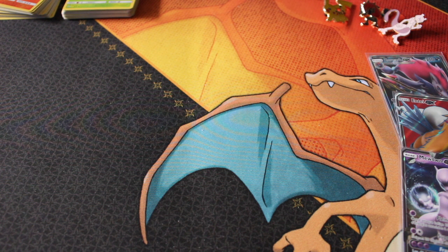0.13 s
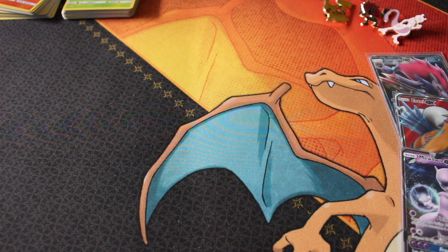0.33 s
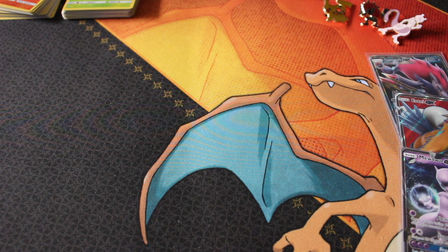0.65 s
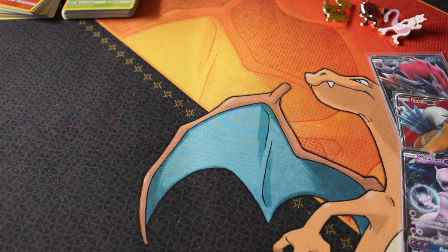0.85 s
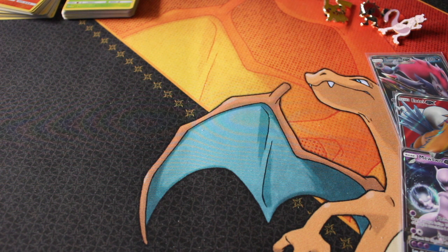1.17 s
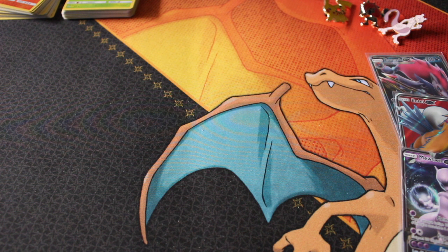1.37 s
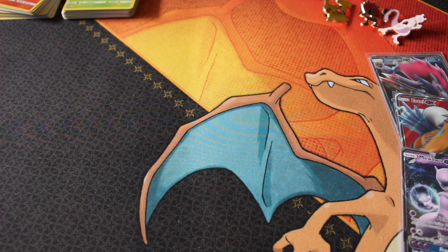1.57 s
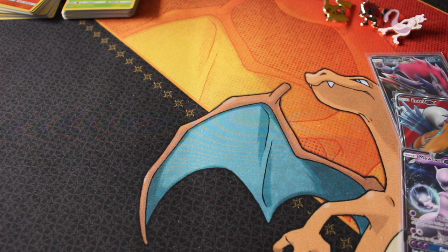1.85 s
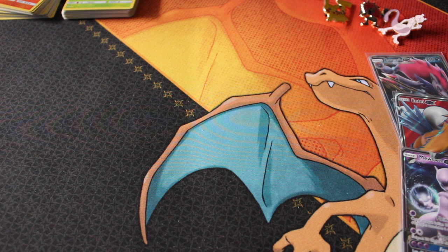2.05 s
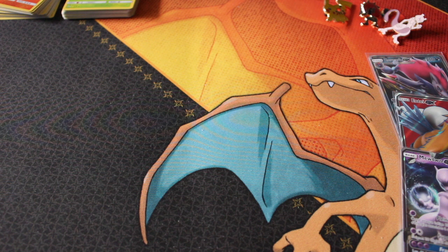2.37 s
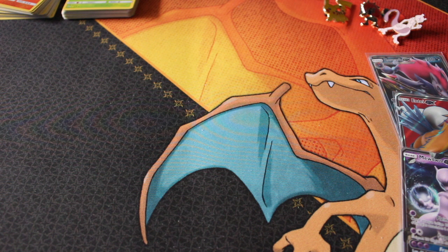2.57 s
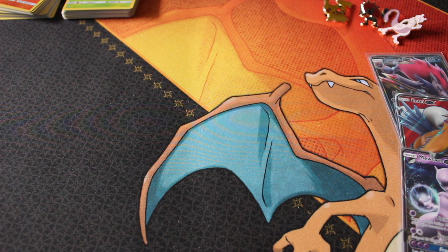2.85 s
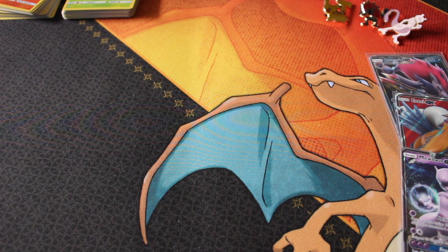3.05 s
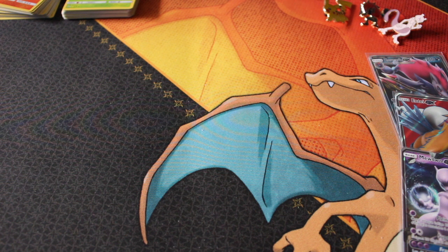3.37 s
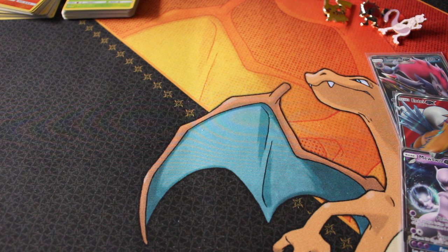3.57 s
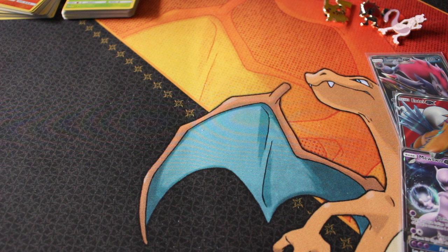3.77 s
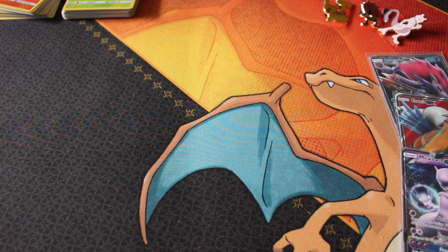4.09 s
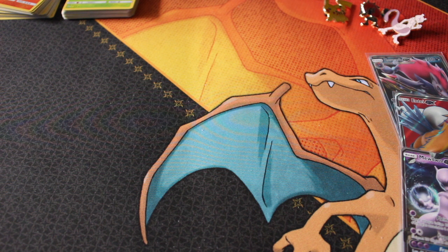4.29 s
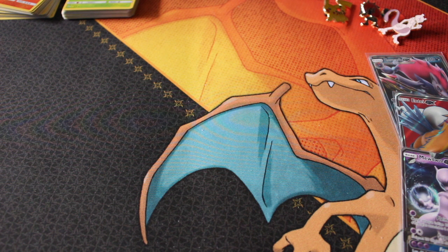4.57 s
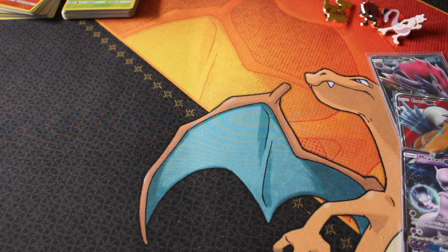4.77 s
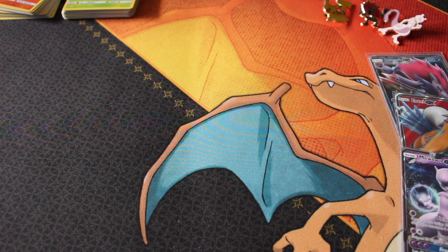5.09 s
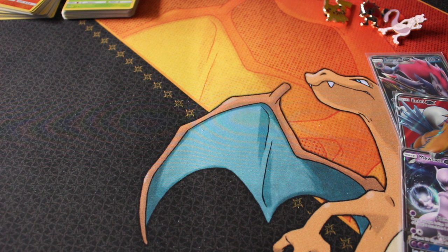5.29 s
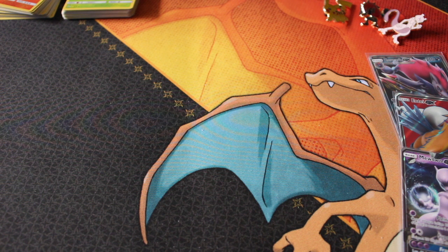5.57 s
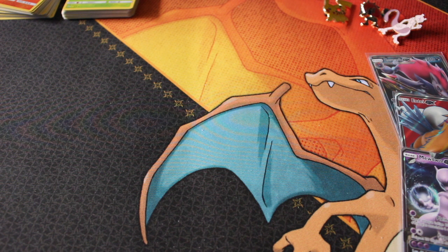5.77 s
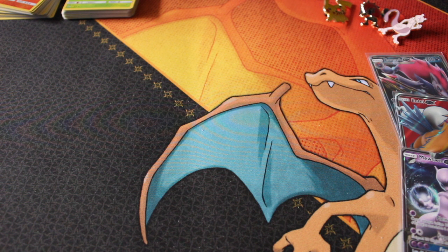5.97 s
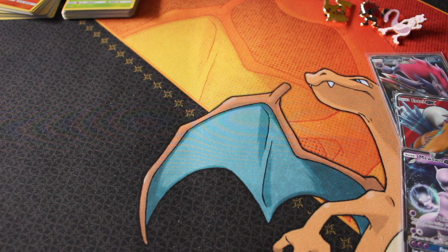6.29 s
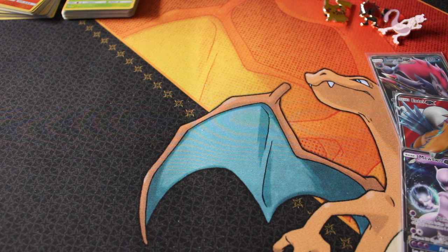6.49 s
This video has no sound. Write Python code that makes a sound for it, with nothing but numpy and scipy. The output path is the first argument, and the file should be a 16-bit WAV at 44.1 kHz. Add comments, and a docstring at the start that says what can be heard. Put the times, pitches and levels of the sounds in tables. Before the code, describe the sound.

Close, slightly roomy handling of a hollow box on a table. Irregular taps and papery, plasticky tears come first, then the loudest boxy knocks, a brief lull, and bright rips. Light scraping and small clicks continue, one more hard knock stands out past the middle, and quieter bumps lead to renewed ripping at the end. Faint hiss, low fan hum and a very thin high whine stay steady.

```python
"""A cardboard and plastic pack is handled near a table microphone in a small room, for 6.6 s.
Knocks and short rips start at once; the hardest knocks land near 1.3-1.5 s, rips cluster near 2.3 s,
another hard knock hits near 3.9 s, then softer ones, with a last flurry of rips and knocks from 5.9 s.
Knocks and rips are bursts of crackling noise through box resonances and room tails. Throughout, pieces
slide (scrape-coloured crackle) over hiss, a fan hum (two narrow noise bands) and a faint screen whine (a sine).
"""
import sys
import numpy as np
from scipy import signal
from scipy.fft import rfft, irfft, next_fast_len
from scipy.io import wavfile
from scipy.ndimage import uniform_filter1d

SR = 44100
rng = np.random.default_rng(int(sys.argv[2]) if len(sys.argv) > 2 else 0)


def to_wav(s):
    """Save 16-bit WAV."""
    ch = np.atleast_2d(s).T  # columns
    pcm = np.round(np.clip(ch, -1, 1) * 32767)  # PCM
    wavfile.write(sys.argv[1], SR, pcm.astype(np.int16))


N = 292824  # length [samples]
SPAN = 2 ** 15  # transform length of one burst [samples]
SNAP_OCT_PER_DB = 0.017  # crisper contact, higher snap [octaves per dB of click]
PANEL_SHARE = 0.5  # the panel follows the snap part of the way [dB per dB]

# Knocks on the box; snap, click and thump levels are relative to the hollow ring:
# (time [s], hollow ring level [dB], snap [dB], click [dB], contact decay time [s], thump [dB])
KNOCKS = [(0.004, -25, -12, -13, .002, -5), (0.386, -20.5, -12, -30, .003, -14),
          (0.476, -16, 6, 0, .004, -7), (0.526, -21, 6, 1, .004, -30), (0.65, -24.5, -8, -23, .006, -9),
          (0.689, -22, 0, -38, .003, -27), (0.899, -29, -23, -28, .003, 0),
          (0.986, -19.5, 2, -30, .0034, -20), (1.146, -15.5, -9, -18, .009, 0.5),
          (1.166, -16, -7, -19, .013, -20), (1.344, -8, -2, -12, .005, -7),
          (1.418, -22, -8, -19.5, .009, -14.5), (1.54, -4, -2, -13, .003, -8),
          (2.047, -52, 10.5, 9.5, .007, 2), (2.199, -25.5, 0, -36, .008, -9),
          (3.127, -33.5, -9, -10, .015, -11.5), (3.168, -29, -7, -9, .01, -21),
          (3.655, -39, -3, -10, .005, -5), (3.94, -9, 4, -1, .002, -30), (4.152, -21, -7, -14, .0044, -20),
          (4.373, -36.5, -10, -14, .0036, -23), (4.874, -29, -18, -28, .003, -13),
          (4.955, -26, -11, -40, .004, -31), (5.198, -42, -14, -1, .005, -8),
          (5.33, -35, -20, -19, .004, -12), (5.505, -35, -13, -20, .007, -13),
          (5.543, -27.5, -20, -36, .005, -29), (5.665, -40.5, -2, -7, .0045, -0.5),
          (5.747, -53, -1, 8, .0035, -6), (6.276, -23, -12, -5.5, .008, -2),
          (6.33, -31.5, 0, -8.5, .007, -18), (6.401, -33, 5.5, -5.5, .006, -6),
          (6.506, -38, -1, -5, .006, -3), (6.547, -40, 7, 0, .0026, -15)]


def knocks():
    """Fingers and table edge strike the box: sudden contact with a strong first blow."""
    return bursts(KNOCKS, pitch_hz=2250, lift_db=3, rise=0.23, spiky_db=4.0, blow=0.32,
                  breadth=1.26, sheen_hz=7000, wet_db=-2.77)


RIP_THUMP_DB = -10  # over the hollow ring: one thump level shared by all rips
# Tears of seams and film; snap and click levels are relative to the hollow ring:
# (time [s], hollow ring level [dB], snap [dB], click [dB], tear decay time [s])
RIPS = [(0.07, -49, 7, -18, .04), (0.199, -49, 6, -1, .014), (0.223, -32, 2, -4, .013),
        (0.24, -28, 0, 3, .028), (0.253, -32, 4, 6, .023), (0.273, -22, 2, -13, .007),
        (0.364, -37, 2, -15, .007), (0.438, -37, 6, 7, .007), (0.468, -28, 3, 4, .02),
        (0.489, -34, 0, 10, .005), (0.785, -48, -0.5, -8, .022), (2.138, -50, -6, -30, .015),
        (2.256, -48, 12, 9, .025), (2.298, -23, 7, 1, .01), (2.316, -26, 10, 4, .012),
        (2.344, -29, 7, 10, .011), (2.626, -51, 4, 7, .02), (2.674, -46, 5, 10, .005),
        (2.691, -36, 10, 10, .011), (3.251, -48, 7, 5, .034), (3.28, -48, -5, 5, .012),
        (3.41, -54, -12, 6, .015), (3.675, -45, 1, 4, .018), (3.689, -35, -1, -3.5, .016),
        (3.759, -52, 5.5, -3, .018), (3.863, -43, -5, -9, .045), (3.896, -40, 5, 2, .045),
        (4.039, -38, 5.5, 1, .022), (4.284, -49, -7, -6, .014), (4.452, -41, -6, -8.5, .018),
        (4.479, -43, -6, -5, .016), (5.219, -45, -20, -14, .03), (5.682, -40, -6, -12, .009),
        (5.913, -56, 5, -5, .02), (5.94, -41.5, -1, -1, .045), (6.01, -28, 6, 3.5, .023),
        (6.023, -29, 14, -1, .0054), (6.31, -30, -8, -3, .006)]


def rips():
    """Seams and film give way: a swelling run of snaps with little first blow."""
    tears = [(*row, RIP_THUMP_DB) for row in RIPS]
    return bursts(tears, pitch_hz=2500, lift_db=2.5, rise=0.3, spiky_db=5.5, blow=0.15,
                  breadth=1.26, sheen_hz=12000, wet_db=-4.5)


def bursts(table, pitch_hz, lift_db, rise, spiky_db, blow, breadth, sheen_hz, wet_db):
    """Short forces on the box: hollow ring, thump, panel, snap and click, each answered by the room."""
    start_s, ring_db, snap_db, click_db, length, thump_db = np.transpose(table)[:, :, None]
    panel_db = lift_db + PANEL_SHARE * snap_db
    snap_hz = pitch_hz * 2 ** (SNAP_OCT_PER_DB * click_db)  # pitch_hz: click as loud as the ring

    t = np.arange(SR // 5) / SR
    hz = np.fft.rfftfreq(SPAN, 1 / SR)
    length = np.clip(length, 1e-3, 0.1)
    shape = (1 - np.exp(-t / (rise * length))) * np.exp(-t / length)
    shape = shape / shape.max(axis=1, keepdims=True)
    energy = np.sqrt(np.sum(shape ** 2, axis=1, keepdims=True))  # root of the envelope's energy
    chatter = shape * crackle(shape.shape, spiky_db, grain=40)
    first_contact = blow * energy * (t == 0)
    force = rfft(chatter + first_contact, SPAN)

    # even strength from range to range, uneven within each
    broad = uniform_filter1d(np.abs(force) ** 2, size=280, axis=1)
    direct = force / np.sqrt(broad) * box(hz)
    first_wall_delay = np.exp(-2j * np.pi * hz * 0.004)  # 4 ms
    walls = first_wall_delay * rfft(tails(count=len(table)), SPAN)

    def part(colour, order):
        """Each part of a burst gets its own random room tail, so the parts blend without cancelling."""
        dry_part = direct * colour
        wet_part = dry_part * np.roll(walls, order, axis=0)
        return unit(dry_part) + amp(wet_db) * unit(wet_part)

    hollow = part(peak(hz, 440, 636) ** 3, order=0)
    thump = amp(thump_db) * part(peak(hz, 140, 220) ** 3, order=1)
    panel = amp(panel_db) * part(peak(hz, 1056, 920) ** 2, order=2)
    snap = amp(snap_db) * part(peak(hz, snap_hz, breadth * snap_hz) ** 3, order=3)
    click = amp(click_db) * part(peak(hz, 4630, sheen_hz) ** 2 * peak(hz, 2580, 4000), order=4)
    mix = irfft(hollow + thump + panel + snap + click, SPAN)[:, :SR * 2 // 3]
    heard = amp(ring_db) * energy * mix

    out = np.zeros(N + SPAN)
    for start, row in zip(start_s[:, 0], heard):
        out[round(start * SR):][:len(row)] += row
    return out[:N]


# Resonant modes of the box: (frequency [Hz], width [Hz], boost of the mode alone [dB])
BOX = [(124, 120, 17.5), (200, 100, 15), (422, 135, 17.5), (567, 130, 13.5), (723, 180, 6.5),
       (787, 150, 7.5), (1035, 210, 8), (1400, 85, 8.5), (1940, 106, 2.5), (2560, 410, 2.5), (5050, 130, 4)]


def box(hz):
    """The hollow box lifts its modes out of anything that shakes it."""
    return 1 + sum((amp(db) - 1) * peak(hz, centre, width) for centre, width, db in BOX)


# Fader moves for the sliding pieces: (time [s], level [dB])
SLIDE = [(0.0, -60), (0.11, -40), (0.3, -62), (0.55, -44), (0.8, -53), (1.68, -46), (1.78, -75),
         (2.12, -56), (2.94, -51), (3.14, -58), (3.29, -41), (3.5, -57), (4.07, -47), (4.55, -57),
         (5.97, -55), (6.16, -56), (6.25, -43), (6.64, -52)]
# Colour of the scrape, relative density: (frequency [Hz], level per Hz [dB])
SCRAPE = [(88, -53), (150, 3), (186, 0.5), (309, 0.5), (821, -1.5), (941, -2.5), (2360, -5.5),
          (7470, -20.5), (16000, -31)]


def sliding():
    """Card rubs on card and cloth: uneven noise, blurred by the walls."""
    rub = crackle((1, N), spiky_db=2.5, grain=300)[0]
    rub = rub + amp(-13.0) * signal.fftconvolve(rub, tails(count=1)[0])[:N]
    rub = unit(filtered(rub, lambda hz: amp(along(SCRAPE, hz))))
    time_s, level_db = np.transpose(SLIDE)
    return amp(np.interp(np.arange(N) / SR, time_s, level_db)) * rub


# Decay of the room: (frequency [Hz], time to fall 60 dB [s])
WALLS = [(100, 0.46), (260, 0.34), (700, 0.32), (1840, 0.23), (4850, 0.31), (12800, 0.19)]


def tails(count):
    """Answers of the walls with energy 1, each frequency dying at its own speed."""
    noise = rng.standard_normal((count, SR // 2))
    hz, t, spectrum = signal.stft(noise, SR, nperseg=256)
    decay = amp(-60 * t / along(WALLS, hz)[:, None])
    tail = signal.istft(spectrum * decay, SR, nperseg=256)[1]
    length = tail.shape[1]
    lumps = np.repeat(rng.standard_normal((count, length // 200 + 1)), 200, axis=1)[:, :length]
    tail = tail * amp(2.34 * lumps)  # single walls and furniture stand out of the blur
    return unit(tail) / np.sqrt(length)


AIR_DB = -55.5  # rms level of the hiss
WHINE_HZ, WHINE_DB = 15735, -75  # screen whine, rms level
# Colour of room and microphone noise, relative density: (frequency [Hz], level per Hz [dB])
AIR = [(8.2, -53), (14, -17.5), (48, -2), (92, 0), (147, -6.5), (198, 10), (298, -5.5), (477, -4), (537, 2),
       (660, -14), (1120, -8), (2550, -10), (8270, -17), (14500, -27.5), (15800, -34)]
# Bands of the fan hum, each filtered twice: (frequency [Hz], width of one pass [Hz], rms level [dB])
FAN = [(103.8, 10.5, -66), (208.7, 25, -62)]


def room_tone():
    """Steady hiss, the blurred hum of a fan as narrow noise bands and a thin sine whine of a screen."""
    hiss = unit(filtered(rng.standard_normal(N), lambda hz: amp(along(AIR, hz))))
    tone = amp(AIR_DB) * hiss
    for centre, width, db in FAN:
        hum = filtered(rng.standard_normal(N), lambda hz: peak(hz, centre, width) ** 2)
        tone = tone + amp(db) * unit(hum)
    whine = np.sqrt(2) * np.sin(2 * np.pi * WHINE_HZ * np.arange(N) / SR)
    return tone + amp(WHINE_DB) * whine


def crackle(shape, spiky_db, grain):
    """Noise whose strength jumps every grain samples: fibres and film snap one by one."""
    rows, n = shape
    jumps = np.repeat(rng.standard_normal((rows, n // grain + 1)), grain, axis=1)[:, :n]
    return unit(rng.standard_normal(shape) * amp(spiky_db * jumps))


def peak(hz, centre_hz, width_hz):
    """A resonance of gain 1 at its centre."""
    return 1j * hz * width_hz / (centre_hz ** 2 - hz ** 2 + 1j * hz * width_hz)


def filtered(x, response):
    """x shaped by a response of frequency, with zero padding for the ring-out."""
    m = next_fast_len(N + SR // 2)
    return irfft(rfft(x, m) * response(np.fft.rfftfreq(m, 1 / SR)), m)[:N]


def along(points, hz):
    """Values between (Hz, value) points, read on a log frequency axis."""
    f, v = np.transpose(points)
    return np.interp(np.log(hz + 1), np.log(f + 1), v)


def amp(db):
    """Gain of a level in dB."""
    return 10 ** (np.asarray(db) / 20)


def unit(x):
    """x at rms 1 along its last axis."""
    return x / np.sqrt(np.mean(np.abs(x) ** 2, axis=-1, keepdims=True) + 1e-20)


def scene():
    """All sources at one microphone."""
    return (knocks() + rips() + sliding() + room_tone())[None]


def record(dry):
    """Gain control leans back after loud moments, peaks flatten at full scale, and the band ends."""
    keep = np.exp(-1 / (0.25 * SR))  # 0.25 s smoothing
    power = signal.lfilter([1 - keep], [1, -keep], dry[0] ** 2)
    knee_power = amp(-33)  # a mean square, so an rms level of -16.5 dB
    ducked = dry[0] * (1 + power / knee_power) ** -0.08
    held = ducked / (1 + np.abs(ducked) ** 6) ** (1 / 6)
    return filtered(held, lambda hz: hz < 15850)[None]


dry = scene()
out = record(dry)
to_wav(out)
```